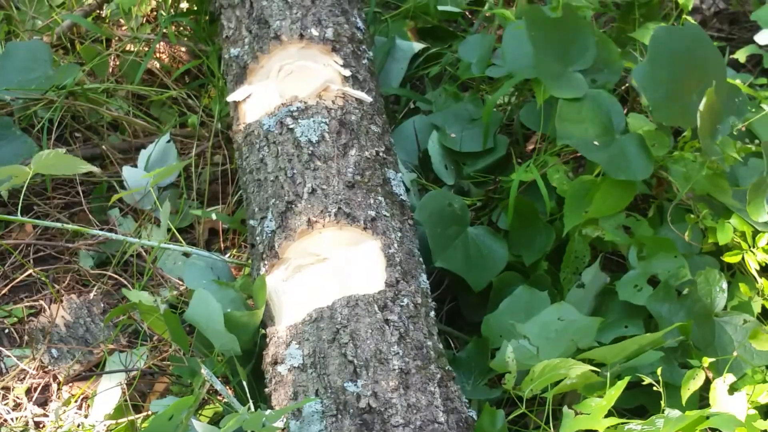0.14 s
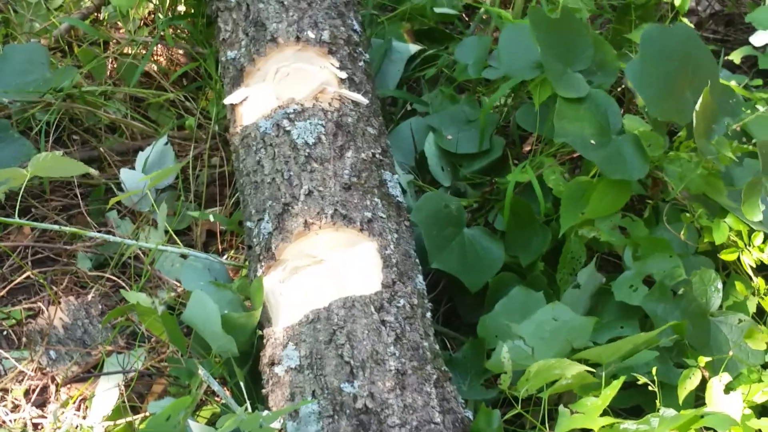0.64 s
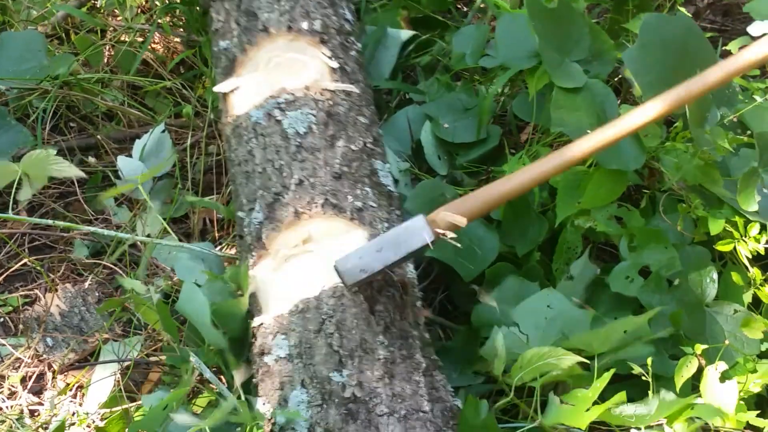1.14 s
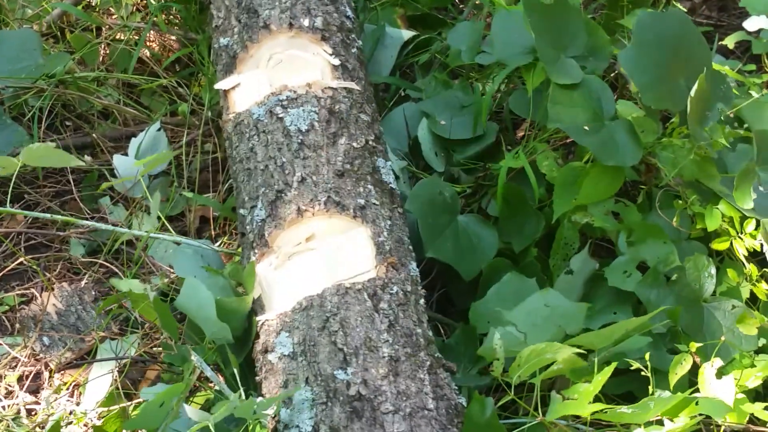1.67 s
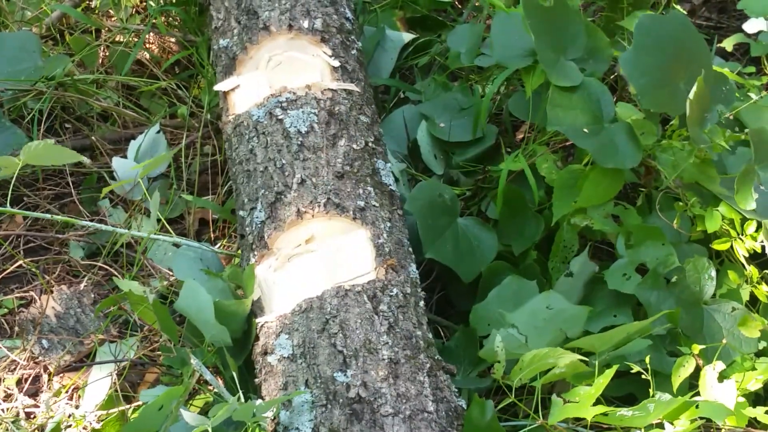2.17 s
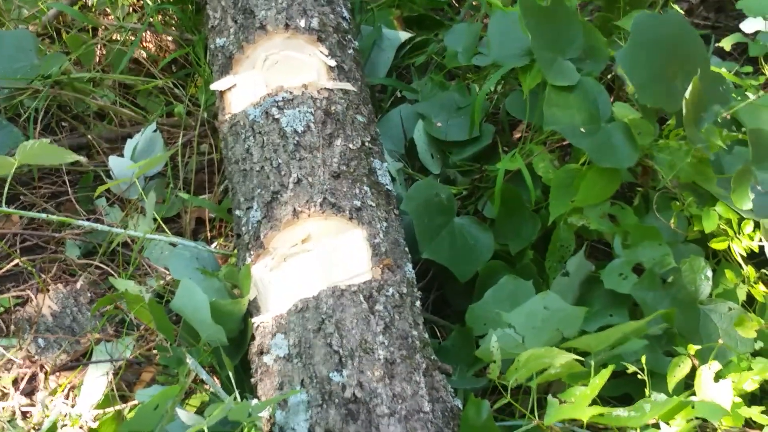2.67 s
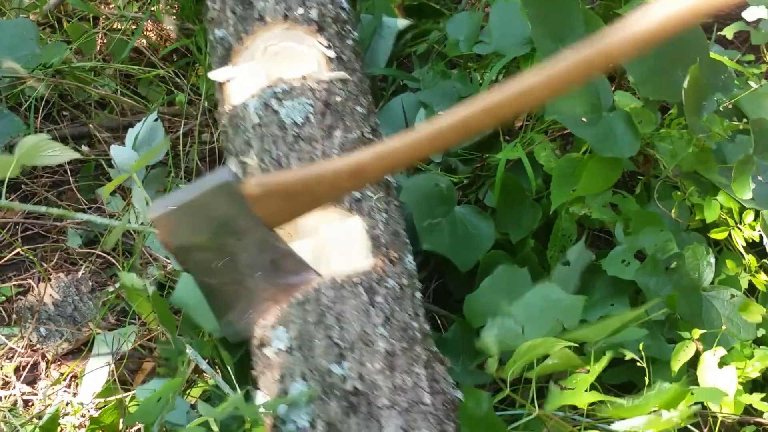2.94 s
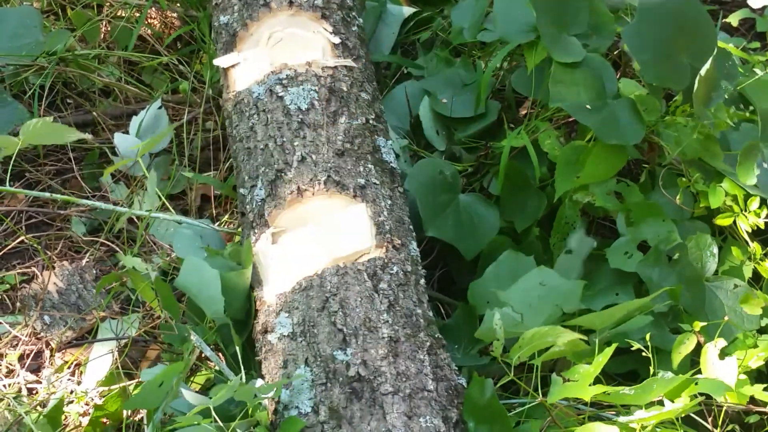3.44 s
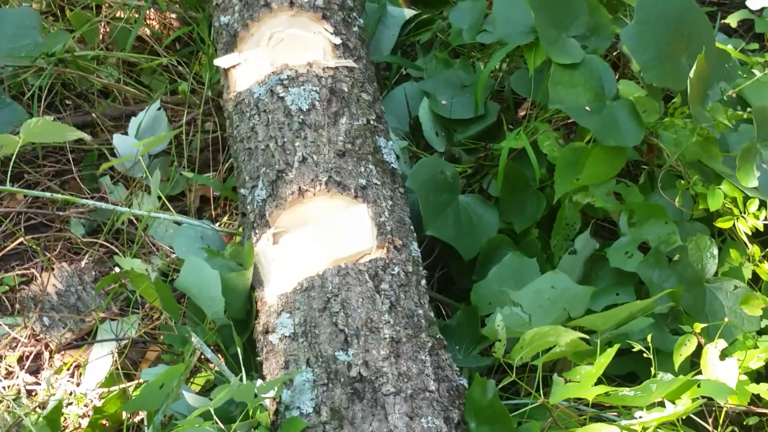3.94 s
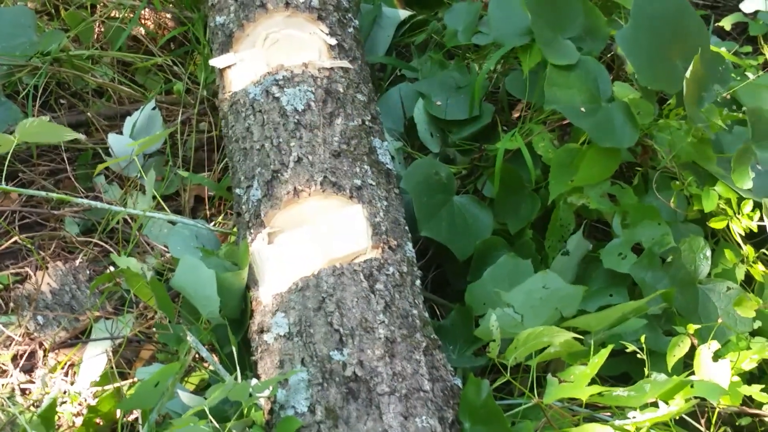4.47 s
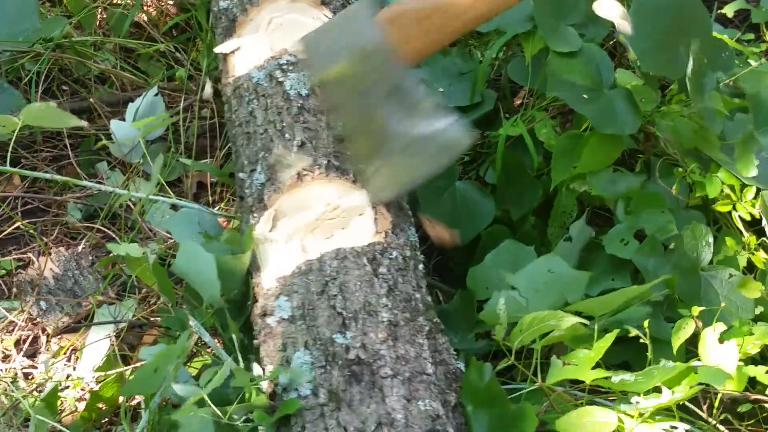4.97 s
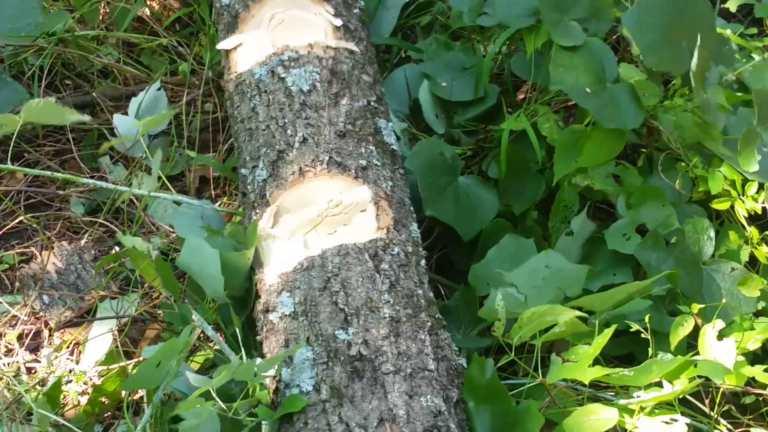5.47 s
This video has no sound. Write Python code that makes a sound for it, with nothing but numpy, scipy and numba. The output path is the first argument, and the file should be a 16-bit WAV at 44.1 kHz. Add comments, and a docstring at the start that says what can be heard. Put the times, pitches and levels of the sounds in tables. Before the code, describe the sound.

Three hard axe blows crack into a log outdoors, each ringing woody and echoing off trees, with chips pattering over faint insect hiss.

```python
"""Chopping a log in summer woods

An axe hits a fallen log three times: noise cracks, sine modes ring the trunk, and noise that builds up
echoes from the trees. A hand hisses along the handle, the blade knocks free, chips patter on leaves.
Behind lie banded noises: air, rumble, a low drone and insects. Two unlike microphone ports pick it all up;
loud blows overload the input, and a gain control ducks the insects and lets them swell back."""
import sys
import numpy as np
from scipy import signal
from scipy.fft import rfft, irfft, next_fast_len
from scipy.io import wavfile
from scipy.ndimage import uniform_filter1d
from numba import njit

SR = 44100
rng = np.random.default_rng(int(sys.argv[2]) if len(sys.argv) > 2 else 0)


def elevation(decibels):
    """Turn decibel levels (scalar or array-like) into linear amplitude ratios."""
    levels = np.asarray(decibels, float)
    return 10 ** (levels / 20)


def to_wav(s):
    """Save 16-bit WAV."""
    ch = np.atleast_2d(s).T  # columns
    pcm = np.round(np.clip(ch, -1, 1) * 32767)  # PCM
    wavfile.write(sys.argv[1], SR, pcm.astype(np.int16))


N = 246941
TIME = np.arange(N) / SR
SIDES = np.array([[1], [-1]])  # left, right


def colour(x, hz, db):
    """Filter with a curve that is straight on a log-frequency axis."""
    f = np.maximum(np.fft.rfftfreq(x.shape[-1], 1 / SR), 1)
    curve_db = np.interp(np.log(f), np.log(hz), db)
    return irfft(rfft(x) * elevation(curve_db), x.shape[-1])


def noise(spectrum, size, alike_hz):
    """Stereo noise of rms 1: both sides alike in the bass, half alike at alike_hz, less above."""
    n = next_fast_len(size, True)
    alike = 1 / (1 + np.fft.rfftfreq(n, 1 / SR) / alike_hz)
    mid, side = rfft(rng.standard_normal((2, n)))
    white = irfft(mid * np.sqrt(1 + alike) + SIDES * side * np.sqrt(1 - alike), n)
    x = colour(white, *np.transpose(spectrum))
    return x[:, :size] / x.std()


def band(hz, width, size, order):
    """Two unrelated noises in a band, rms 1."""
    n = next_fast_len(size, True)
    off_centre = 2 * np.abs(np.fft.rfftfreq(n, 1 / SR) - hz) / width
    x = irfft(rfft(rng.standard_normal((2, n))) / (1 + off_centre ** order), n)
    return x[:, :size] / x.std()


def walk(rate):
    """Random levels held 1 / rate s, then smoothed twice into a slow wander."""
    k = int(SR / rate)
    steps = np.repeat(rng.standard_normal(N // k + 1), k)
    return uniform_filter1d(uniform_filter1d(steps, k), k)[:N]


def spell(start, length, db, rise, fall, change_db):
    """Gain over time: 20 dB up per rise s until start, drifting by change_db, then 20 dB down per fall s."""
    since = TIME - start
    drift = change_db * np.clip(since / length, 0, 1)
    outside = np.maximum(0, np.maximum(-since / rise, (since - length) / fall))
    return elevation(db + drift - 20 * outside)


def add(out, s, sound, pan_db=0.):
    """Mix a sound in at time s; pan_db is left minus right."""
    i = int(s * SR)
    out[:, i:i + sound.shape[-1]] += (sound * elevation(SIDES * pan_db / 2))[:, :N - i]


# tone of the air in the woods: [f/Hz, level/dB]
AIR = [(25, -7), (50, -0.5), (110, -2.5), (200, -14), (450, -13), (1000, -23), (2000, -25), (3000, -27),
       (6000, -25.5), (10000, -26), (16000, -17.5)]


def air():
    """The steady noise of the open air, stronger on the right."""
    return elevation(-51 - 3 * SIDES) * noise(AIR, N, alike_hz=150)


def rumble():
    """Far rumble: a low band of noise whose level wanders."""
    return elevation(-63.5 + 2.4 * walk(8) - 1.9 * SIDES) * band(64, 55, size=N, order=2)


def drone():
    """A faint low drone: a narrow band of noise that wavers, and a steady one near three times its pitch."""
    hum = elevation(-62.5 + 3 * walk(3)) * band(109, 12, size=N, order=2)[0]
    overtone = elevation(-83) * band(330, 35, size=N, order=2)[0]
    return hum + overtone


# bands of the insect chorus: [f/Hz, width/Hz, level/dB, left minus right/dB]
CHORUS = [(3790, 620, -64.5, -9), (4410, 1700, -60, -17.5), (7470, 860, -56, -3.5), (7920, 500, -59, -1.5)]


def insects():
    """So many insects call at once that they merge into bands of smooth hiss."""
    out = np.zeros((2, N))
    for hz, width, db, pan_db in CHORUS:
        level_db = db + SIDES * pan_db / 2 + .7 * walk(5.7)
        out += elevation(level_db) * band(hz, width, size=N, order=3)
    return out


def knock(hz, rattle_db):
    """A soft push of two or three cycles, with a lower woody rattle behind it."""
    t = TIME[:SR // 4]
    push = np.sin(np.pi * np.minimum(t * hz / 2.44, 1)) ** 2
    thump = push * np.sin(2 * np.pi * hz * t)
    wood = band(.75 * hz, .8 * hz, size=len(t), order=4)[0]
    rattle = elevation(rattle_db - 60 * t / .16) * (1 - np.exp(-t * hz)) * wood
    return (thump + rattle)[None]


# dull knocks of feet, the trunk settling and, at 5.030 s, a big chip landing:
# [t/s, level/dB, f/Hz, left minus right/dB]
DULL_KNOCKS = [(0.262, -42, 98, -5), (0.364, -43, 94, -8), (1.958, -47, 64.9, -18),
               (2.378, -43.5, 140, -21), (2.482, -44.5, 112, -12), (2.785, -40, 105, -6),
               (3.385, -41, 90, -12.5), (5.030, -39, 500, 0.5)]


def thuds():
    """Feet, the settling trunk and a big chip landing each give a short dull knock."""
    out = np.zeros((2, N))
    for s, db, hz, pan_db in DULL_KNOCKS:
        add(out, s, elevation(db) * knock(hz, rattle_db=-12.5), pan_db)
    return out


# the palm runs along the handle on the upswing: [start t/s, length/s, level at the start/dB]
HAND_SLIDES = [(0.038, .1, -60), (0.345, .12, -55.5), (2.182, .13, -53), (2.785, .015, -62.5),
               (4.014, .18, -55.5)]
# tone of skin on wood: [f/Hz, level/dB]
SKIN = [(1500, -29.5), (3000, -13), (5500, -4), (8000, -3.5), (9500, -3), (11500, 0), (16000, -5.5)]


def hand():
    """Dry skin on smooth wood: a short bright hiss that grows as the hand speeds up."""
    sliding = sum(spell(*row, rise=.08, fall=.05, change_db=7) for row in HAND_SLIDES)
    return sliding * noise(SKIN, N, alike_hz=500) * elevation(SIDES * 5.0)


# the blade is pulled free: [t/s, level of the first knock/dB]
BLADE_PULLS = [(1.193, -17), (3.135, -16), (4.801, -19)]


def blade_pulls():
    """The blade comes free with a double knock; the second is weaker and relatively more rattly."""
    out = np.zeros((2, N))
    hz, pan_db = 368, 2.5
    for s, db in BLADE_PULLS:
        add(out, s, elevation(db) * knock(hz, rattle_db=-12), pan_db)
        add(out, s + 0.015, elevation(db - 14) * knock(hz, rattle_db=-5), pan_db)
    return out


# the clearest chips landing on leaves: [t/s, level before a 2.5 dB cut/dB, centre f/Hz, left minus right/dB]
CLEAR_CHIPS = [(4.6629, -7.5, 12190, -0.5), (5.031, -17.5, 12800, 3.5), (5.0656, -17, 13630, 1.5),
               (5.110, -27.5, 8000, -1.5), (5.125, -33, 5000, -7), (5.139, -32, 4050, 7),
               (5.147, -28, 12300, 1.5), (5.167, -27, 8070, -1), (5.261, -29, 9000, -6.5),
               (5.322, -30, 11590, -1), (5.338, -26, 11000, -2), (5.349, -28, 12100, 3),
               (5.506, -30, 12130, -4)]


def chips():
    """Each chip ticks on a leaf: a tiny burst of banded noise. Smaller crumbs fall at random times."""
    out, t = np.zeros((2, N)), TIME[:2048]
    when, pitch, size, side = rng.random(size=(9, 4)).T
    # the crumbs fall after the last blow
    crumbs = zip(5.15 + .29 * when, -35 + 4 * (2 * size - 1), 3500 + 9500 * pitch, 4 * (2 * side - 1))
    shape = (1 - np.exp(-t / 0.00033)) * np.exp(-t / .0022)
    for s, db, hz, pan_db in CLEAR_CHIPS + list(crumbs):
        tick = shape * band(hz, 0.84 * hz, size=2048, order=3)
        add(out, s, elevation(db - 2.5) * tick, pan_db)
    return out


# spells of shaken leaves and bark crumbs: [start t/s, length/s, level at the start/dB]
SHAKEN_LEAVES = [(1.33, .32, -49.5), (1.782, 0.044, -57), (3.19, .16, -47.5), (3.395, .13, -47.5),
                 (3.643, .15, -57), (5.057, 0.057, -48.5), (5.176, .05, -34), (5.309, .07, -44),
                 (5.431, 0.031, -49.5)]
# tone of the rustle: [f/Hz, level/dB]
LEAF_TONE = [(300, -9), (1000, -13.5), (2500, -9.5), (5000, -4), (8000, -4.5), (12000, 4), (16000, -6.5)]


def leaves():
    """Leaves and bark crumbs rustle: noise made grainy by a fast and a slower wander in level."""
    grains = elevation(1.5 * walk(300) + 1.7 * walk(43))
    shaken = sum(spell(*row, rise=.1, fall=.06, change_db=-2.5) for row in SHAKEN_LEAVES)
    return shaken * grains * noise(LEAF_TONE, N, alike_hz=500) * elevation(SIDES * 1.4)


# tone of the echo from the nearest trees: [f/Hz, level/dB]
NEAR_TREES = [(150, -23), (500, -0.5), (1000, -3.5), (1500, -8), (2200, 0.5), (3500, -2), (5500, 4),
              (7500, -4.5), (9000, 0), (12000, 2), (16000, -6)]
# tone of the echo from the far trees: [f/Hz, level/dB]
FAR_TREES = [(150, -12.5), (500, 1), (1000, -8.5), (2500, -5), (5000, 3), (8000, -1), (12000, 4.5),
             (16000, -5)]


def tree_echo():
    """Scattered echoes as dying noise: the nearest trees are louder, the far ones linger."""
    t = TIME[:SR]
    near = elevation(-5 - 60 * t / .33) * noise(NEAR_TREES, SR, alike_hz=600)
    far = elevation(-15 - 60 * t / 0.69) * noise(FAR_TREES, SR, alike_hz=600)
    return (near + far) * elevation(1.5 * walk(76)[:SR])


# modes of trunk and handle; every blow lands elsewhere:
# [f/Hz, time to fall 60 dB before damping and choking/s, level in blow 1/dB, in blow 2/dB, in blow 3/dB]
TRUNK_MODES = [(71.7, 0.29, 5, 3.5, 8.5), (105, 0.077, 1, -6.5, 6), (175.2, 0.33, 9.5, 8, 6),
               (219, 0.3, -10, -2, -12.5), (264.3, .2, 3.5, 2, -12), (297.5, 0.26, 15.5, -2, -2.5),
               (324.4, 0.13, 8.5, 4, 0), (379, 0.14, -2.5, -0.5, -2), (451, 0.091, 9, -10, 6.5),
               (474, 0.14, 1.5, -8, -7), (542, .1, -10, 5.5, -6), (576, 0.11, -8, 4.5, -6),
               (625, 0.12, -11.5, -11, -2.5), (727, 0.059, -2.5, 1.5, 1), (1000, 0.026, 12.5, 9.5, 4),
               (1310, .025, 0.5, -4.5, 12), (1847, 0.017, -4, -4, 5), (2070, 0.005, -4.5, 9, -1.5),
               (2874, 0.02, -4, 15, -6), (3733, 0.023, 18.5, 17, -4)]


def trunk(blow, sustain, lag_s):
    """The wood rings in many dying sine modes; the left port hears them lag_s later."""
    hz, t60, *db = np.transpose(TRUNK_MODES)
    t = np.maximum(TIME[:SR] - np.array([[lag_s], [0]]), 0)[..., None]
    # the trunk sinks back into the litter, which chokes its ring ever faster: 10 dB lost by 0.24 s
    fade_db = -60 * t / (t60 * sustain) - 10 * (t / 0.24) ** 2
    ring = (np.sin(2 * np.pi * hz * t) * elevation(fade_db)) @ elevation(db[blow])
    # ground and undergrowth smear the ring
    ground = noise([(120, -8.5), (300, 4), (800, 0.0), (2500, -24.5)], 8192, alike_hz=5000)
    scatter = elevation(-47.5 - 60 * TIME[:8192] / .15) * ground
    return ring + signal.fftconvolve(ring, scatter, axes=1)[:, :SR]


# the blade jolts again in the cut:
# [t/s, level against its blow/dB, blow counted from 0, push length/s, direction: 1 in, -1 out]
BLADE_JOLTS = [(2.8555, -6, 1, 0.0041, 1), (2.8680, -8.5, 1, 0.0022, 1), (4.6375, -2.5, 2, .002, -1),
               (4.6485, -10, 2, 0.0033, -1)]


def jolts(rings):
    """Each jolt shoves the trunk briefly, so its ring sounds again, softened by the push."""
    out = np.zeros((2, N))
    for s, db, blow, push, direction in BLADE_JOLTS:
        shove = np.sin(np.pi * np.minimum(TIME[:400] / push, 1))
        again = signal.fftconvolve(rings[int(blow)], shove[None] / shove.sum())[:, :SR]
        add(out, s, np.sign(direction) * elevation(db) * again)
    return out


# blows of the axe; a stuck blade damps the trunk:
# [t/s, crack level before the bite/dB, crack centre f/Hz, swell of the tree echo/s, ring time factor]
AXE_BLOWS = [(0.9898, 21.5, 3697, .054, 0.96), (2.8317, 24, 3294, .058, .85),
             (4.6220, 22, 1417, 0.028, 0.9)]
# the hollow ring after each blow: [level before the echo's swell/dB, time to fall 60 dB/s]
HOLLOW_RINGS = [(-20.5, 0.41), (-29, 0.74), (-30.5, .3)]


def axe():
    """Crack of splitting fibres, ring of the trunk, and the echo that builds up from trees all round."""
    out, t = np.zeros((2, N)), TIME[:SR]
    rings = [trunk(k, blow[-1], lag_s=.00006) for k, blow in enumerate(AXE_BLOWS)]
    # the blade needs a moment to bite
    bite = 1 - np.exp(-(t / .002) ** 2)
    for (s, db, hz, swell, _), (hollow_db, hollow_t60), ring in zip(AXE_BLOWS, HOLLOW_RINGS, rings):
        # a duller crack lasts longer
        decay = .002 * (3000 / hz) ** 0.59
        fibres = [(300, -12), (hz, 0), (1.6 * hz, -5), (9000, -5), (16000, -2)]
        snap = np.exp(-t / decay) + elevation(-21.0) * np.exp(-t / 0.0082)
        crack = elevation(db) * snap * noise(fibres, SR, alike_hz=15000)
        # the echo starts weakly and swells after some tens of milliseconds
        build = elevation(-13) + 1 - np.exp(-(t / swell) ** 4)
        # a blurred resonance near 1 kHz outlasts the knock
        hollow = elevation(hollow_db - 60 * t / hollow_t60) * band(1030, 200, size=SR, order=2)
        add(out, s, bite * (ring + crack + build * (tree_echo() + hollow)))
    out += jolts(rings)
    # a log in the open radiates deep bass poorly
    return signal.sosfilt(signal.butter(4, 135, "high", fs=SR, output="sos"), out)


def scene():
    """All sources as they reach the microphones, from the background to the axe."""
    background = air() + rumble() + drone() + insects()
    knocks_and_hand = thuds() + hand() + blade_pulls()
    return background + knocks_and_hand + chips() + leaves() + axe()


def causal(x, hz, db):
    """Filter with a minimum-phase response, so that nothing comes before a hit."""
    f = np.maximum(np.fft.rfftfreq(2048, 1 / SR), 1)
    cepstrum = irfft(np.log(elevation(np.interp(np.log(f), np.log(hz), db))))
    # fold the second half of the cepstrum onto the first
    cepstrum[1:1024] *= 2
    cepstrum[1025:] = 0
    return signal.fftconvolve(x, irfft(np.exp(rfft(cepstrum))))[:len(x)]


# tone of the two microphone ports: [f/Hz, left level/dB, right level/dB]
PORT_TONE = [(500, 1, 0.5), (930, 3.5, 4.5), (1800, 3, 4.5), (2240, 1, 0.5), (2870, -3.5, 4.5),
             (4838, -20.5, 0.5), (6000, -13.5, 0.5), (6450, -29.5, 0), (7600, -10, -3), (9000, -7, -4),
             (11000, 1, -1.5), (11200, 2, -5), (14800, 0, -9.5), (16100, -3, -10)]


def ports(dry):
    """Each microphone port colours the sound in its own way."""
    hz, left_db, right_db = np.transpose(PORT_TONE)
    return np.array([causal(dry[0], hz, left_db), causal(dry[1], hz, right_db)])


@njit
def duck(level, top, start_db, depth_db, hold, rise, attack, smooth):
    """Gain in dB: a peak over top pulls it towards -depth_db; after a hold it climbs back at a steady rate."""
    gain, want, g, wait = np.empty(len(level)), start_db, start_db, 0.
    for i in range(len(level)):
        if level[i] > top:
            want, wait = -depth_db, hold
        elif wait > 0:
            wait -= 1
        else:
            want = min(want + rise, 0.)
        g += (want - g) * (attack if want < g else smooth)
        gain[i] = g
    return gain


def low_pass(x):
    """Removes everything above the highest recorded frequency."""
    return signal.sosfilt(signal.butter(12, 15630, fs=SR, output="sos"), x)


def record(dry):
    """Port colours, gain control, input hiss, overload and a steep treble cut."""
    x = ports(dry)
    # hold 0.82 s, climb 45 dB/s, react within 3.6 ms, recover smoothly over 0.1 s
    gain_db = duck(np.abs(x).max(0), 1., start_db=-6.0, depth_db=14.0, hold=.82 * SR, rise=45. / SR,
                   attack=1 / (0.0036 * SR), smooth=1 / (.1 * SR))
    hiss = elevation(-72.5) * noise([(100, -2.0), (5000, -9), (10000, -2), (16000, -6.5)], N, alike_hz=10)
    # the input overloads at 0.92
    x = np.clip(x * elevation(gain_db) + hiss, -.92, .92)
    x = signal.sosfilt(signal.ellip(10, .3, 50, 15650, fs=SR, output="sos"), x)
    mix = np.clip(x, -1, 1)
    return low_pass(mix)


dry = scene()
out = record(dry)
to_wav(out)
```